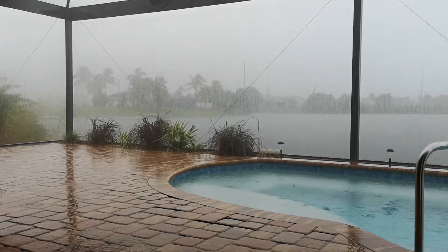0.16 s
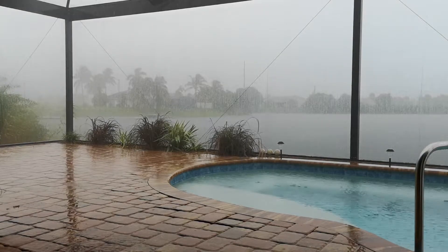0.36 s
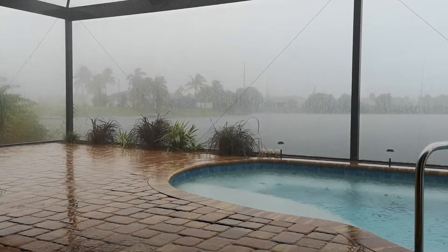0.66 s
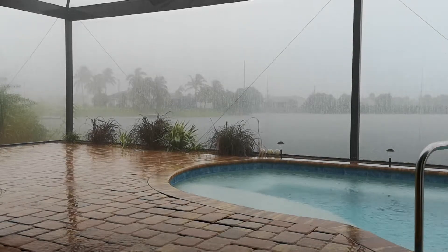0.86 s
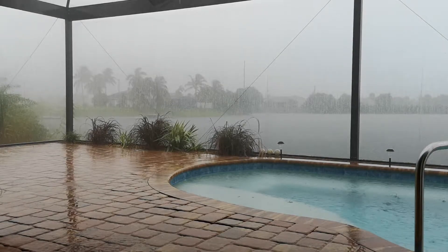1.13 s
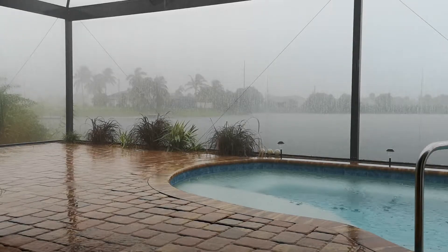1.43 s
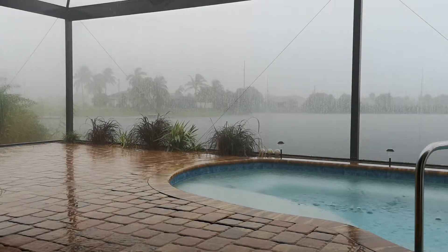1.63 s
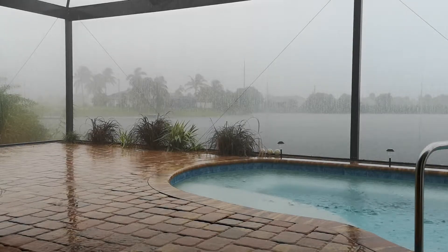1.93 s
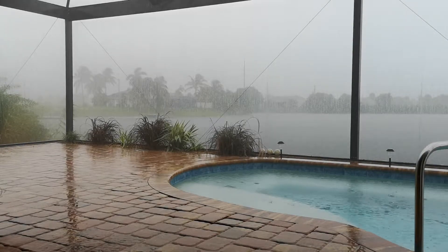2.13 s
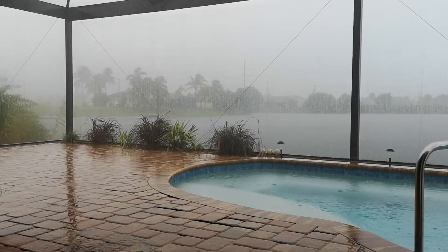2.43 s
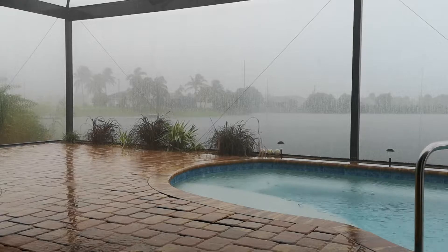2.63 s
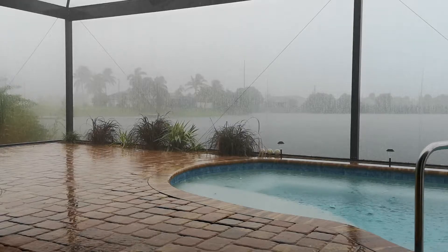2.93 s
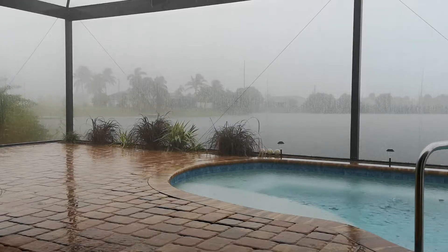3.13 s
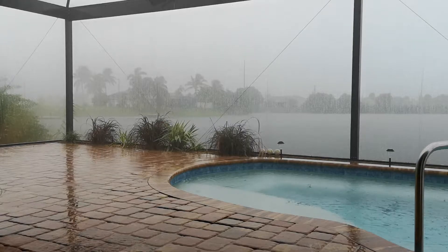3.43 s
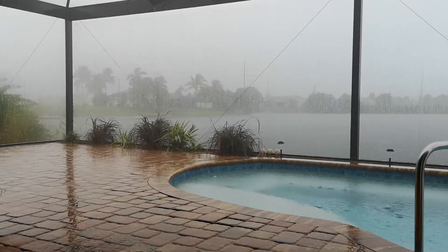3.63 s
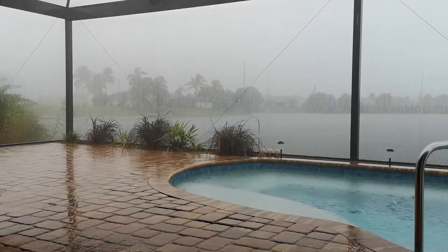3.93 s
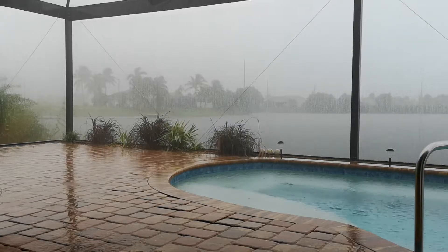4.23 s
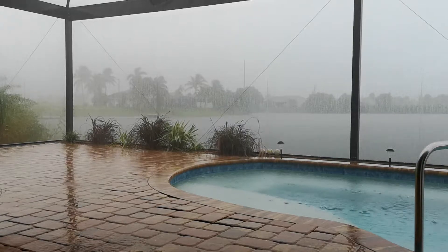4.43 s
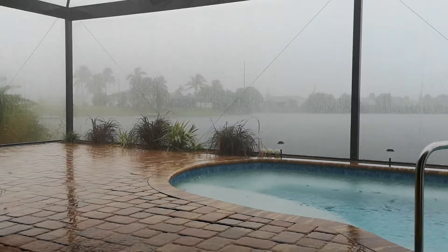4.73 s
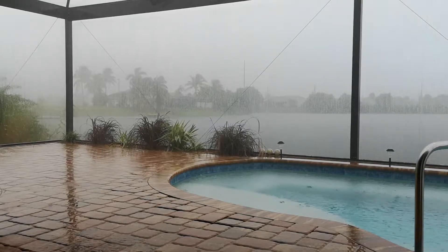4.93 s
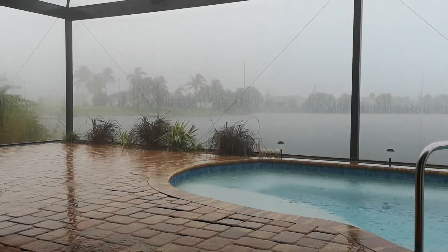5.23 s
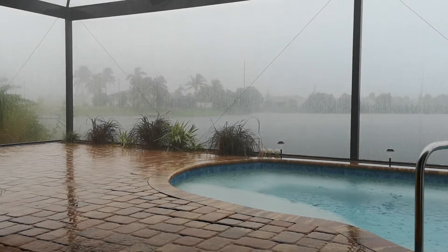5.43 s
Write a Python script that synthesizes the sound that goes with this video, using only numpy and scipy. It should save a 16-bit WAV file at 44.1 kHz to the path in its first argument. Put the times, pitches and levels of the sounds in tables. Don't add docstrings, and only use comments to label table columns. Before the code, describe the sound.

Steady heavy rain hisses and patters on a tiled patio, pool and screen, with sharp nearby ticks and one big splash around four seconds.

```python
import sys
import numpy as np
from scipy import signal
from scipy.fft import rfft, irfft, next_fast_len
from scipy.io import wavfile
from scipy.ndimage import uniform_filter1d

SR = 44100
rng = np.random.default_rng(int(sys.argv[2]) if len(sys.argv) > 2 else 0)


def to_linear_factor(level_db):
    exponent = np.asarray(level_db, float) / 20
    return 10 ** exponent


def master_out(mix):
    frames = np.transpose(np.atleast_2d(mix))
    ceiling = np.clip(frames, -1, 1)
    pcm = np.round(ceiling * 32767).astype(np.int16)
    wavfile.write(sys.argv[1], SR, pcm)


N = 245460

# time_s, level_db
DOWNPOUR = [
    (0.0, -40),
    (2.12, -39.5),
    (2.45, -40.5),
    (3.8, -38),
    (4.51, -39.5),
    (4.94, -38.5),
    (5.57, -40),
]
# mean_db, downpour_share (ratio), wind_share (ratio)
SURFACES = [
    (-42, 0.25, 0.16),
    (-38.5, 0.35, 0.095),
    (-39.5, 1, 0.043),
]
# time_s, peak_db, half_length_s
BUFFETS = [(.01, -30, 0.085), (.32, -36, 0.078), (0.487, -36.5, 0.071), (0.794, -35.5, 0.075),
           (0.954, -33.5, 0.017), (1.18, -31.5, 0.064), (1.385, -32, 0.044), (1.604, -34, .09),
           (1.97, -37.5, 0.15), (2.12, -35.5, 0.055), (2.282, -35, 0.065), (2.544, -34, 0.098),
           (2.837, -35.5, 0.046), (3.04, -35.5, 0.055), (3.19, -37, 0.12), (3.564, -38, 0.1),
           (3.87, -36.5, 0.066), (4.4, -32.5, 0.041), (4.562, -33.5, 0.021), (4.8, -39.5, .07),
           (4.98, -41.5, 0.083), (5.234, -34.5, .04), (5.432, -27, .04), (5.56, -31.5, 0.035)]
# start_s, rms_db, fullest_s, left_minus_right_db
SPATTERS = [
    (0.169, -34, 0.011, -3),
    (1.34, -34, 0.017, -3),
    (2.061, -35, 0.014, 1),
    (2.16, -39, 0.025, 1),
    (2.72, -38.5, 0.042, -1),
    (3.73, -42, 0.038, 2),
    (4.132, -23.5, 0.029, 2.5),
    (4.809, -31, 0.017, -1),
    (5.03, -34, 0.04, 2.5),
]
# low_hz, high_hz
SPATTER_BAND = (2300, 10600)
# start_s, rms_db, fullest_s, left_minus_right_db
SPRAYS = [(.369, -33, .016, 3), (.41, -37.5, 0.043, -1), (.606, -39, 0.02, 0), (1.42, -38, 0.02, -5),
          (1.47, -45, .046, -1), (3.64, -41, .017, 6), (3.945, -37.5, 0.021, -4), (4.0, -41, 0.027, -6),
          (4.125, -25.5, 0.0085, 8), (4.617, -39, .012, -9), (5.019, -30.5, 0.016, -7),
          (5.14, -39.5, 0.013, 8)]
# low_hz, high_hz
SPRAY_BAND = (4780, 10500)
# start_s, rms_db, centre_hz,
# fullest_s, left_minus_right_db
SLOPS = [(.625, -33, 2300, 0.026, 0), (.62, -40, 5050, 0.028, 2), (1.037, -40.5, 5140, 0.026, -2),
         (1.15, -41.5, 310, 0.018, 2), (1.221, -42, 3270, .021, 3), (1.43, -33.5, 2300, 0.027, -8),
         (1.794, -31, 2970, 0.0046, -7), (1.8, -41, 3530, 0.029, 1), (2.162, -35, 3320, .004, -6),
         (2.43, -44, 280, 0.039, 4), (2.51, -41.5, 870, 0.022, -4), (3.44, -42, 322, 0.029, -5),
         (4.124, -17, 2300, 0.0098, 5), (4.135, -36, 5360, .025, -4), (4.14, -23.5, 2240, 0.028, 2.5),
         (4.45, -39.5, 2860, 0.031, -2), (4.67, -45.5, 258, 0.031, 4), (4.68, -41.5, 836, 0.052, 2),
         (4.812, -34, 5330, 0.0054, -4), (5.019, -35, 2500, 0.0066, -11), (5.025, -29.5, 2210, 0.024, -1),
         (5.05, -28.5, 1790, 0.027, 3), (5.27, -44, 740, .04, -2), (3.45, -49, 1040, 0.16, -6)]
# start_s, peak_db, ring_hz, half_of_left_minus_right_db
TICKS = [(0.0904, -29, 5640, -2), (.169, -25, 7550, 0), (0.304, -31, 7670, 0), (0.363, -23, 7400, 1.5),
         (0.605, -23, 7860, -6), (1.059, -23, 5370, 1), (1.089, -28, 7070, 1), (1.222, -29, 3420, -8),
         (1.3528, -32, 6700, 3), (1.4096, -26, 8370, .5), (1.475, -23.5, 5840, -5), (1.51, -25, 5720, .5),
         (1.6606, -35, 7860, -10), (1.691, -31, 7900, -11), (1.793, -28, 3750, 1), (2.0607, -34, 3590, 0),
         (2.15, -35, 3520, -2), (2.339, -25.5, 6300, -3), (3.316, -30, 3600, -4), (3.6538, -27, 5440, 1),
         (3.7403, -24, 8150, 0), (3.9464, -29, 6670, -8), (3.9988, -22, 7550, -3), (4.2114, -27, 5230, 1),
         (4.6169, -31.5, 7700, -.5), (4.814, -25, 5100, 4), (4.953, -24, 8100, 0), (5.022, -26, 7500, -6),
         (5.0586, -26, 4000, -2), (5.1497, -31, 8000, -3)]
# start_s, peak_db, left_minus_right_db
SNAPS = [
    (.0894, -25, -8),
    (.6047, -30, -6),
    (1.2494, -35, 2),
    (1.474, -33, -10),
    (1.691, -31, -20),
    (2.0607, -32, -8),
    (3.9458, -29, -12),
    (3.9983, -17, -12),
]
# start_s, peak_db, pitch_hz, ring_s, left_minus_right_db
PLINKS = [
    (0.369, -16.5, 7060, 0.00021, 5),
    (3.998, -26, 6000, 0.00011, -8),
    (5.02, -26, 7300, .0003, -6),
    (.605, -29.5, 1780, 0.0021, -23),
    (2.525, -37, 915, 0.0045, -4),
    (4.122, -18, 6740, 0.00024, 8),
    (4.129, -22, 7070, .0015, 6),
]
# frequency_hz, density_db (per Hz)
RAIN_SPECTRUM = [(12, -38), (20, -2.5), (59, -1.5), (101, -0.5), (416, -24), (906, -21), (1270, -24.5),
                 (1920, -19), (2680, -26), (3260, -30), (6360, -32.5), (7730, -31.5), (11700, -46.5),
                 (14300, -45.5), (15500, -42.5)]
# centre_hz, width_hz, peak_db
PORCH_MODES = [
    (39, 52, 4),
    (99.4, 15, 0.5),
    (186, 14, 0),
    (263, 235, -5),
    (900, 86, 1),
    (2655, 235, 5),
    (5430, 1000, 1),
]
# centre_hz, width_hz, peak_db
PORTS = [
    (7880, 1400, 5.5),
    (9170, 720, 9),
]
# frequency_hz, left_minus_right_db
LEAN = [(60, -11), (99, 9), (160, -4), (270, 0), (450, -6), (740, -1.5), (1220, -1.5), (2010, -3.5),
        (3330, -1), (5500, 0.5), (9080, 0.5), (15000, -5.5)]
# frequency_hz, correlation (-1 to 1)
LIKENESS = [(60, 1), (170, 1), (260, 0.86), (345, 0.82), (430, -0.31), (550, -0.64), (750, 0.026),
            (1050, -0.5), (1400, -0.044), (2000, 0.28), (2700, -0.031), (15000, -0.085)]


def downpour(near, flicker_db, gust_db):
    trains = [drops(per_s=5000, spread_db=5.0, smooth=0.78) + to_linear_factor(-7.5) * near for _ in range(2)]
    gust = drift(6.0)
    surfaces = np.zeros((4, 2, N))
    edges = 17.7 * 2 ** np.arange(0, 10.1, 0.5)
    for k, (low_hz, high_hz) in enumerate(zip(edges, edges[1:])):
        mid, side = band(trains[k % 2], low_hz, high_hz)
        hz = np.sqrt(low_hz * high_hz)
        alike = np.clip(at_hz(LIKENESS, hz), -0.999, 0.999)
        bright = np.clip(np.log2(hz / 700) / 12, 0, 1)
        gain = to_linear_factor(flicker_db * drift(10.6) + gust_db * bright * gust)
        stereo = np.sqrt(1 + alike) * mid + np.sqrt(1 - alike) * side * [[1], [-1]]
        surfaces[np.searchsorted([200, 1400, 3000], hz)] += gain * stereo
    coloured = map(colour, surfaces)
    return sum(to_linear_factor(db) * rms_one(x) for x, db in zip(coloured, surface_levels()))


def surface_levels():
    t = np.arange(N) / SR
    rumble_db, wind_memory_s = -39, 0.37
    power = to_linear_factor(2 * rumble_db)
    for s, db, half_s in BUFFETS:
        power = power + to_linear_factor(2 * db) * np.exp(-((t - s) / half_s) ** 2)
    roof_db = 10 * np.log10(power)
    wind_db = uniform_filter1d(roof_db, int(wind_memory_s * SR))
    rain_db = np.interp(t, *np.transpose(DOWNPOUR))
    rain_swing, wind_swing = rain_db - rain_db.mean(), wind_db - wind_db.mean()
    return [roof_db] + [db + rain * rain_swing + wind * wind_swing for db, rain, wind in SURFACES]


def drops(per_s, spread_db, smooth):
    sizes = to_linear_factor(spread_db * np.minimum(rng.exponential(1, (2, N)), 5))
    signs = rng.choice([-1, 1], (2, N))
    impacts = rms_one(sizes * signs * (rng.random((2, N)) < per_s / SR))
    return np.sqrt(smooth) * rng.standard_normal((2, N)) + np.sqrt(1 - smooth) * impacts


def droplets(per_s, cycles):
    clicks, out = drops(per_s, spread_db=3.5, smooth=0), 0
    dealt = rng.integers(0, 30, (2, N))
    pitches_hz = np.geomspace(1300, 12000, 30) * rng.uniform(0.97, 1.03, 30)
    for k, hz in enumerate(pitches_hz):
        r = to_linear_factor(-60 * hz / cycles / SR)
        w = 2 * np.pi * hz / SR
        hits = clicks * (dealt == k) + 1e-18
        out = out + hz * signal.lfilter([0, np.sin(w)], [1, -2 * r * np.cos(w), r * r], hits)
    return rms_one(out)


def splashes(near, hard_s, mist_db):
    spray = colour(drops(per_s=2500, spread_db=3.5, smooth=0.9) + to_linear_factor(-9.0) * near)
    out = np.zeros((2, N))
    lead = 2000
    for s, db, low_hz, high_hz, fullest_s, lean_db in spills():
        i = round(s * SR)
        age = np.arange(int(7 * fullest_s * SR)) / SR / fullest_s
        start = np.exp(-(fullest_s / hard_s) ** 2)
        shape = (start + (1 - start) * age * np.e) * np.exp(-age ** 0.98)
        water = spray[:, i - lead:i + len(age)]
        part = band(band(water, low_hz, high_hz), low_hz, 1.3 * high_hz)
        if high_hz > 3500:
            part += to_linear_factor(mist_db) * band(water, 8380, 10800)
            part += to_linear_factor(-5.5) * band(water, 10900, 14300)
        if high_hz < 600:
            part = part[[0, 0]]
        out[:, i:i + len(age)] += to_linear_factor(db) * pan(lean_db) * shape * rms_one(part[:, lead:])
    return out


def spills():
    rows = [(s, db, *SPATTER_BAND, fullest_s, lean_db) for s, db, fullest_s, lean_db in SPATTERS]
    rows += [(s, db, *SPRAY_BAND, fullest_s, lean_db) for s, db, fullest_s, lean_db in SPRAYS]
    for s, db, hz, fullest_s, lean_db in SLOPS:
        ratio = max(1.36 - 0.1 * np.log2(hz / 2000), 1.05)
        rows.append((s, db, hz / ratio, hz * ratio, fullest_s, lean_db))
    return rows


def plinks():
    out, t = np.zeros((2, N)), np.arange(3000) / SR
    for s, db, hz, ring_s, lean_db in PLINKS:
        i = round(s * SR)
        out[:, i:i + len(t)] += to_linear_factor(db) * pan(lean_db) * ring(t, hz, ring_s)
    return out


def ticks(ring_s, tail_db, tail_s):
    out, t = np.zeros((2, N)), np.arange(2000) / SR
    far_snap = to_linear_factor(-33) * snap(t)
    for s, db, hz, lean_db in TICKS:
        noise = rng.standard_normal((2, len(t)))
        tail = to_linear_factor(tail_db) * band(noise, hz / 3.4, hz * 1.28) * np.exp(-t / tail_s)
        i = round(s * SR)
        out[:, i:i + len(t)] += pan(2 * lean_db) * (to_linear_factor(db) * (ring(t, hz, ring_s) + tail) + far_snap)
    return ceiling_echo(out, echo_db=-4.5)


def near_snaps():
    out, t = np.zeros((2, N)), np.arange(2000) / SR
    sharp = snap(t)
    dull = signal.sosfilt(signal.cheby2(10, 50, 16100, fs=SR, output="sos"), sharp)
    for s, db, lean_db in SNAPS:
        i = round(s * SR)
        out[:, i:i + len(t)] += pan(lean_db) * to_linear_factor(db) * (sharp if db > -25 else dull)
    return ceiling_echo(out, echo_db=-10.5)


def ring(t, hz, ring_s):
    return np.sin(2 * np.pi * hz * t) * t / ring_s * np.exp(1 - t / ring_s)


def snap(t):
    return band(np.cos(2 * np.pi * 10500 * t) * np.exp(-t / 0.00006), 6500, 16500)


def ceiling_echo(x, echo_db):
    return x + to_linear_factor(echo_db) * np.roll(x, round(0.006 * SR), axis=1)


def colour(x):
    size = next_fast_len(N + 8192)
    hz = np.maximum(np.fft.rfftfreq(size, 1 / SR), 1)
    shared = at_hz(RAIN_SPECTRUM, hz) + sum(bump(hz, *mode) for mode in PORCH_MODES)
    lean = at_hz(LEAN, hz) / 2 * hz ** 2 / (hz ** 2 + 400 ** 2)
    response_db = [shared + lean + bump(hz, *PORTS[0]), shared - lean + bump(hz, *PORTS[1])]
    cepstrum = irfft(np.log(to_linear_factor(response_db)), size)
    cepstrum[:, 1:size // 2] *= 2
    cepstrum[:, size // 2 + 1:] = 0
    return irfft(rfft(x, size) * np.exp(rfft(cepstrum)), size)[:, :N]


def bump(hz, centre_hz, width_hz, top_db):
    return top_db / (1 + (2 * (hz - centre_hz) / width_hz) ** 2)


def at_hz(points, hz):
    table = np.array(points)
    return np.interp(np.log(hz), np.log(table[:, 0]), table[:, 1])


def band(x, low_hz, high_hz):
    edges = np.clip([low_hz, high_hz], 10, 0.45 * SR)
    return signal.sosfilt(signal.butter(2, edges, "band", fs=SR, output="sos"), x)


def drift(rate_hz):
    hop = 40
    r = np.exp(-2 * np.pi * hop * rate_hz / SR)
    noise = rng.standard_normal(N // hop + 2002)
    slow = signal.lfilter([1], [1, -2 * r, r * r], noise)[2000:]
    return np.interp(np.arange(N) / hop, np.arange(len(slow)), rms_one(slow))


def pan(lean_db):
    return to_linear_factor(np.array([[lean_db], [-lean_db]]) / 2)


def rms_one(x):
    return x / np.sqrt(np.mean(x ** 2) + 1e-20)


def scene():
    near = droplets(per_s=2500, cycles=117.0)
    rain = downpour(near, flicker_db=1.0, gust_db=-0.5)
    rain += splashes(near, hard_s=0.014, mist_db=-11.5)
    rain += plinks()
    rain += ticks(ring_s=0.00019, tail_db=-10, tail_s=0.0078)
    return signal.sosfilt(signal.cheby2(20, 60, 15400, fs=SR, output="sos"), rain) + near_snaps()


def band_limit(x):
    return signal.sosfilt(signal.butter(12, 16500, fs=SR, output="sos"), x)


def record(dry):
    return band_limit(dry)


dry = scene()
out = record(dry)
master_out(out)
```